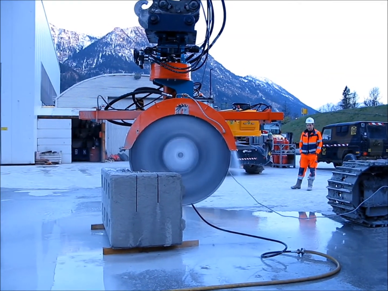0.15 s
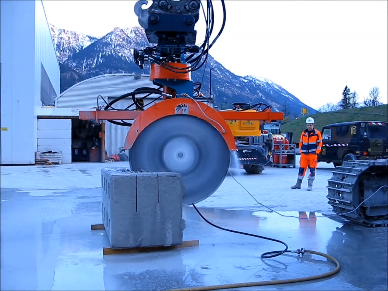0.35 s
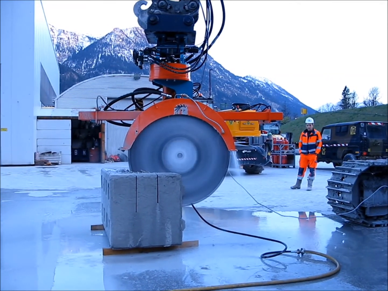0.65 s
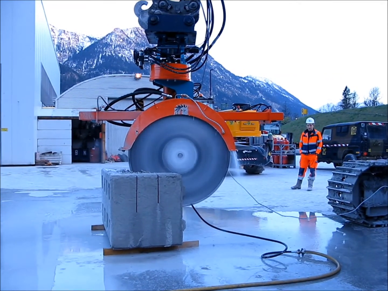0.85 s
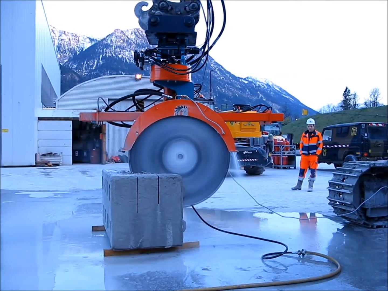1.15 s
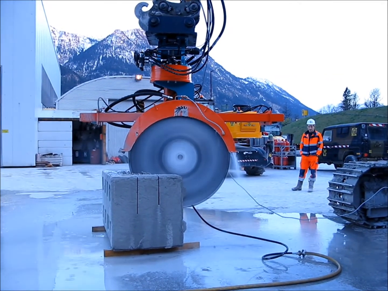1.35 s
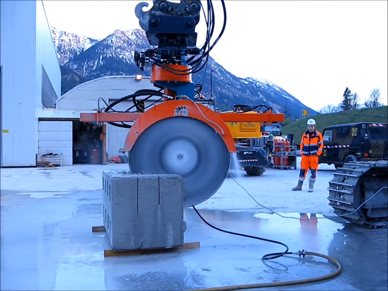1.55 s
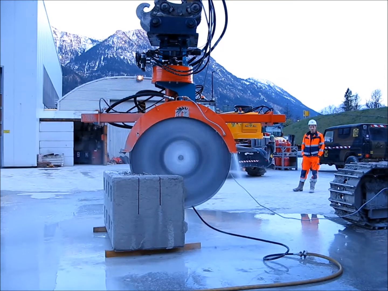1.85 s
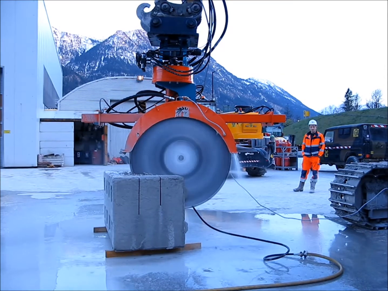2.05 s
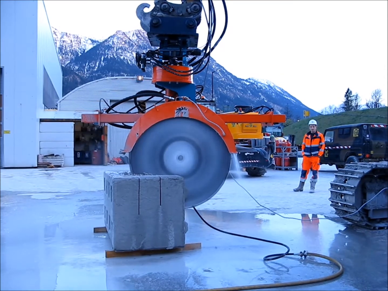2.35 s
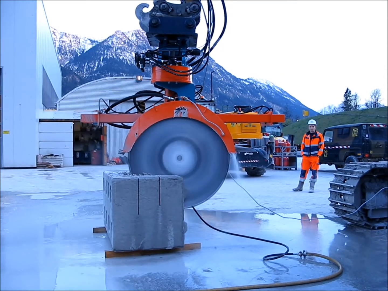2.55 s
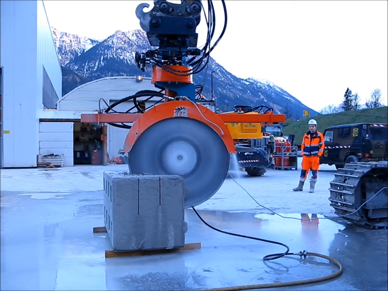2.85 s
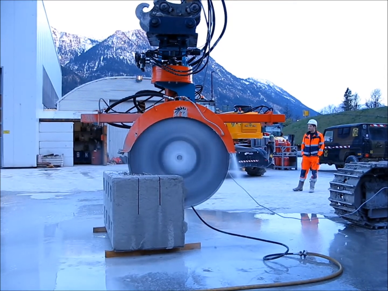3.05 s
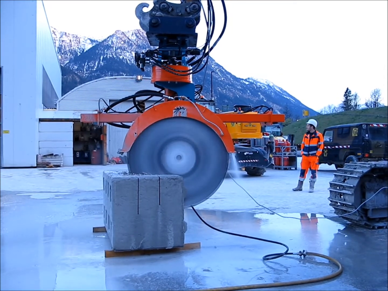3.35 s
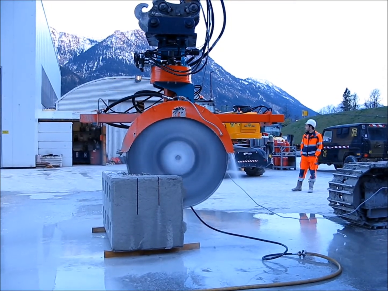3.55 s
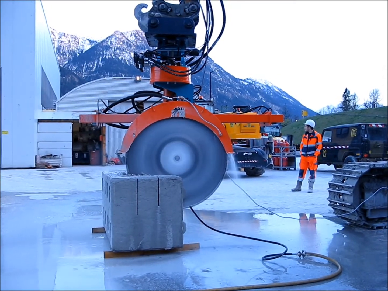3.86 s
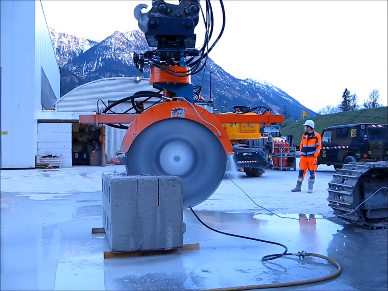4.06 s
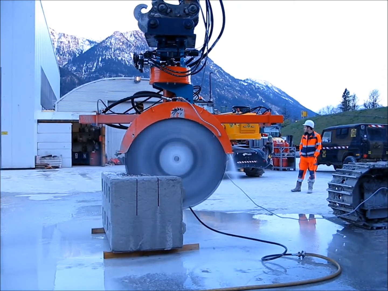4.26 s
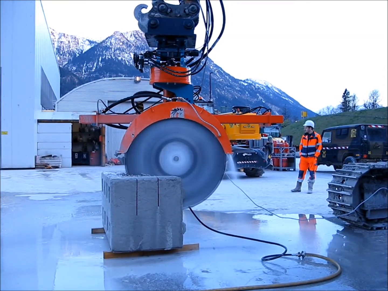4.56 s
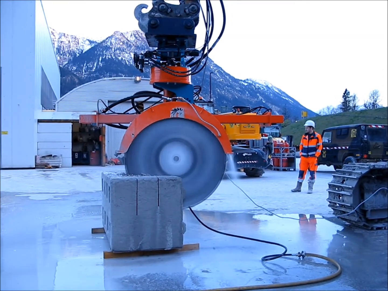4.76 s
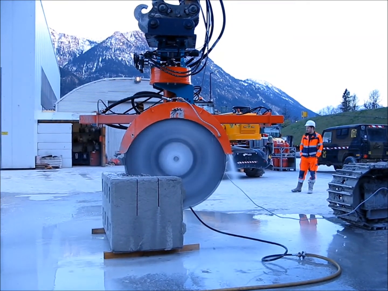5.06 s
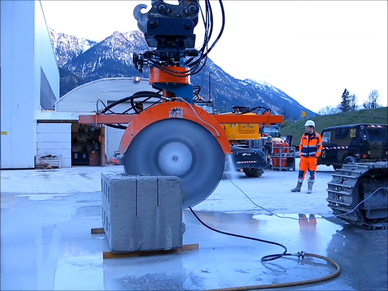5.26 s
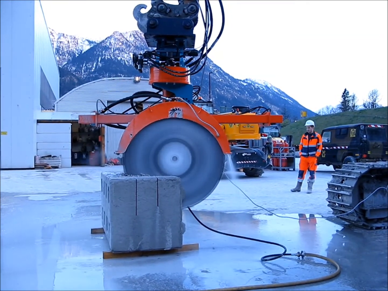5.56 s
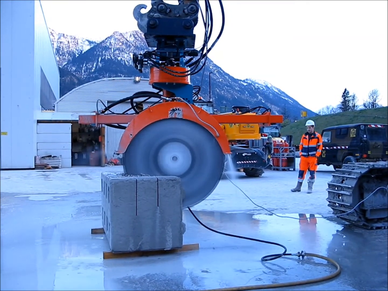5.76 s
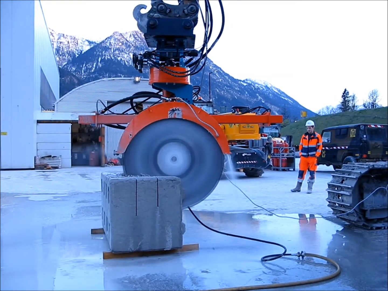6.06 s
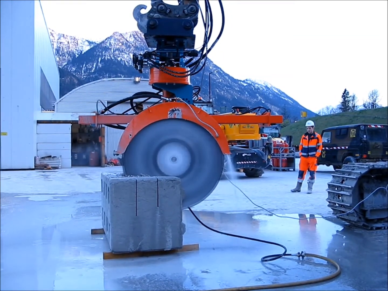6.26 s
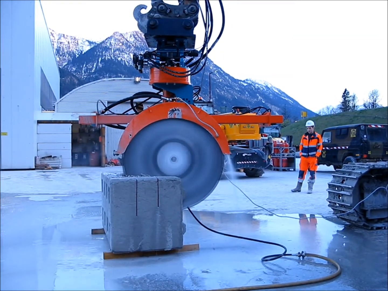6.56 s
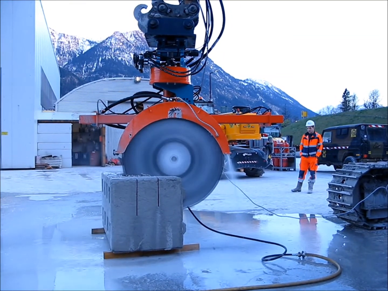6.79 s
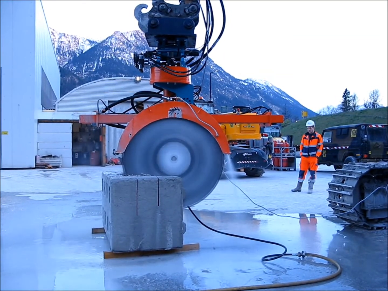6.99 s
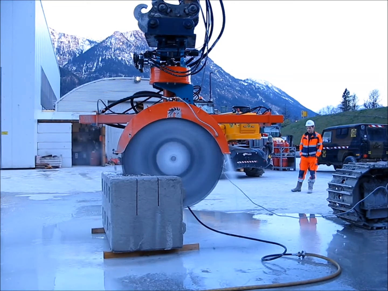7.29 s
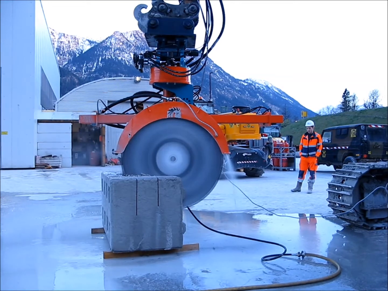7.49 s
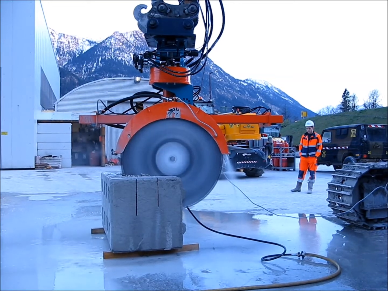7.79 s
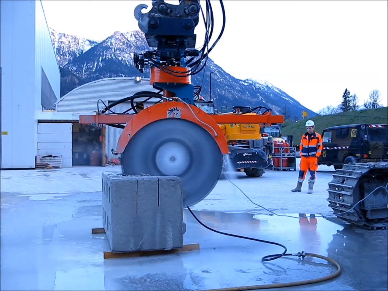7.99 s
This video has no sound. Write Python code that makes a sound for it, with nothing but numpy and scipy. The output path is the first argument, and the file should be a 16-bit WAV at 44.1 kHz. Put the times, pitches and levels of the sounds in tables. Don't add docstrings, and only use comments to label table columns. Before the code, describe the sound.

From 0 to about 8 seconds a large steel saw disc grinds continuously into a concrete block in an open wet yard, already running at the start and still running at the end. The noise is harsh, gritty and bright, a thick hiss of many metallic ringing pitches, strongest around 3 to 9 kHz, with little bass. It throbs about 9.5 times a second, each turn slightly different, with small surges near 0.8, 2, 3.2 and 4.9. A faint wavering whine near 570 Hz rises around 0.7, 2.2 and 3.6 to 4.1, nearly vanishes near 5.9, then returns weakly. The highest treble is a touch duller from 4 to 5.5, then opens slightly. At 6.4 a brief, dull, low-mid knock sounds from the block, partly buried. Engine and pump hum stays faint underneath. Centred, dry outdoor sound with only tiny stereo flecks.

```python
import sys
import numpy as np
from scipy import signal
from scipy.fft import rfft, irfft, next_fast_len
from scipy.io import wavfile
from scipy.ndimage import uniform_filter1d

SR = 44100
rng = np.random.default_rng(int(sys.argv[2]) if len(sys.argv) > 2 else 0)


def voltage_ratio(level):
    return 10 ** (np.asarray(level, float) / 20)


def log_audio(samples):
    frames = np.atleast_2d(samples).T
    limited = np.clip(frames, -1, 1)
    pcm = np.round(limited * 32767).astype(np.int16)
    wavfile.write(sys.argv[1], SR, pcm)


N = 358533

TURN_HZ = 9.518
SEGMENTS = 60
# t/s, slip off the even pass rate f/Hz, level/dB
SEGMENT_WHINE = [(0, -.1, -59), (.65, -.1, -47.5), (1.3, -.3, -56.5), (1.7, -.3, -65), (2.2, .2, -48),
                 (3.0, -.2, -50), (3.6, -.2, -46), (4.1, .4, -46.5), (4.7, .9, -54), (5.2, -.8, -62),
                 (5.85, -.8, -70), (6.9, -.3, -53), (7.8, -.3, -51), (8.13, -1, -57)]


def rms_one(x):
    return x / np.sqrt(np.mean(x ** 2) + 1e-20)


def in_time(rows):
    s, *columns = np.transpose(rows)
    return [np.interp(np.arange(N) / SR, s, c) for c in columns]


def at_hz(points, hz):
    points = np.array(points)
    return np.interp(np.log(hz), np.log(points[:, 0]), points[:, 1])


def drift(size, span):
    step = max(span / 8, 1)
    coarse = rng.standard_normal(size // 4 + 64)[:int(size / step) + 16]
    for _ in range(2):
        coarse = uniform_filter1d(coarse, size=8)
    return np.interp(np.arange(size) / step, np.arange(len(coarse)), rms_one(coarse))


def grinding():
    # t/s, level/dB
    openness = [
        (0, 1.2),
        (.7, .5),
        (1.5, 0.8),
        (2.1, 1.0),
        (3.3, 1),
        (4.1, -1.3),
        (5.5, -1),
        (6.9, -0.3),
        (8.13, 0),
    ]
    # f/Hz, share
    openness_share = [(1200, -0.3), (4000, -0.06), (8000, 0.7), (10000, -0.1), (12100, 1), (13500, 0)]
    # f/Hz, share
    repeat_share = [(150, .1), (320, .35), (450, .68), (580, .6), (800, .46), (1250, .21), (1800, .18),
                    (2600, .07), (5000, .05), (8000, .01)]
    # f/Hz, share
    load_share = [(500, 0.11), (1500, 0.1), (3500, 0.63), (7500, 0.96), (13000, 0.56)]

    size = next_fast_len(N + SR // 2)
    hz = np.maximum(np.arange(size // 2 + 1) * SR / size, 1e-3)
    clumps_db = 0.56 * drift(size, span=40.0)
    grit = rms_one(rng.standard_normal(size) * voltage_ratio(clumps_db))

    back = np.clip(at_hz(repeat_share, hz), 0, .95)
    memory = np.sqrt(1 - back ** 2) / (1 - back * np.exp(-2j * np.pi * hz / TURN_HZ))
    contact = irfft(rfft(grit) * memory, size)
    sound = rfft(shifting_modes(contact)) * saw_colour(hz)

    load_db = rim_load_db() + 0.32 * drift(N, span=1300.0)
    open_db, = in_time(openness)
    strike_db = uniform_filter1d(in_time(SEGMENT_WHINE)[1], SR) + 54

    centres = np.sort(np.append(np.geomspace(200, 15700, 13), [12100, 13500]))
    out = np.zeros(N)
    for centre in centres:
        share = np.interp(np.log(hz), np.log(centres), centres == centre)
        band = irfft(sound * share, size)[:N]
        block_hum = 0.1 * np.exp(-(np.log(centre / 450) / 0.42) ** 2)
        slow_db = at_hz(openness_share, centre) * open_db + block_hum * strike_db
        out += band * voltage_ratio(slow_db + at_hz(load_share, centre) * load_db)
    return voltage_ratio(0.56) * out


def rim_load_db():
    # place as share of a turn, width as share of a turn, height over the low rim level/dB
    high_spots = [
        (.23, 0.081, 1.34),
        (.49, 0.058, 1.5),
        (.73, 0.092, 4.0),
    ]
    # t/s, level/dB, length/s
    surges = [(.77, 1, .03), (0.838, -0.5, .03), (1.02, 0.5, .04), (1.13, 0, 0.013), (1.65, -2, .04),
              (1.92, 1, 0.11), (2.18, 1.5, 0.043), (3.227, 1.2, 0.067), (3.648, 1, .04), (3.76, -.9, .04),
              (4.38, 0.3, .04), (4.804, -1, .04), (4.92, 2, 0.055), (5.748, -0.5, .04), (5.85, 0, .04),
              (6.07, 1.0, 0.037), (6.17, -1.5, .04), (7.17, -0.2, .08), (7.54, -1, .05), (7.75, -0.3, .05)]
    low_rim_db = -2.06
    bite_spread, feed_spread_db = 0.23, 0.27

    t = np.arange(N) / SR
    profile = np.full(N, low_rim_db)
    for place, width, db in high_spots:
        away = (t * TURN_HZ - place + .5) % 1 - .5
        profile += db * np.exp(-.5 * (away / width) ** 2)

    turns = np.arange(int(N / SR * TURN_HZ) + 2)
    chances = rng.standard_normal((len(turns), 2)).T
    bite, feed = (np.interp(t * TURN_HZ, turns, c) for c in chances)
    surge_db = sum(db * np.exp(-.5 * ((t - s) / length) ** 2) for s, db, length in surges)
    return profile * (1 + bite_spread * bite) + feed_spread_db * feed + surge_db


def saw_colour(hz):
    # f/Hz, level/dB per Hz
    broad_colour = [(5, -104), (30, -102), (55, -91), (100, -88.5), (140, -114), (230, -100), (330, -88),
                    (365, -75.5), (420, -82), (480, -74.5), (550, -77.5),
                    (610, -79.2), (800, -77.0), (1080, -79.2), (1300, -68.4), (1450, -75.9), (1750, -73.3),
                    (2050, -72.8), (2300, -73.6), (2580, -69.1),
                    (2620, -72.8), (2900, -68.9), (3500, -63.9), (3950, -62.5), (4550, -66.1), (5200, -64.9),
                   (5900, -69.0), (6200, -67.9), (6640, -74.8),
                    (6660, -71.6), (7300, -69.5), (7900, -69.8), (8500, -71.1), (9350, -74.3),
                     (10200, -68.8), (10950, -67.4),
                    (11050, -67.8), (12000, -70.8), (12600, -73.1), (13500, -69.1), (14330, -72.6),
                      (14800, -72.1), (15740, -76.0)]
    # f/Hz, width/Hz, rms level/dB
    ringing_modes = [(767, 31, -59.6), (939, 73, -50.0), (1140, 12, -60.9), (1242, 25, -49.4),
                     (1308, 12, -53.8), (1417, 12, -59.6), (1504, 41, -49.0), (1593, 40, -48.7),
                     (1707, 12, -58.4), (1818, 17, -56.7), (1874, 19, -57.4), (1987, 15, -53.1),
                     (2120, 89, -45.5), (2268, 47, -45.8), (2390, 81, -44.1), (2507, 12, -62.0),
                     (2655, 15, -50.6), (2720, 12, -50.6), (2801, 119, -39.5), (2925, 12, -48.1),
                  (2971, 47, -42.0), (3099, 78, -40.2), (3217, 22, -46.0), (3322, 46, -43.1),
                  (3422, 24, -43.6), (3464, 27, -43.9), (3530, 72, -39.5), (3650, 70, -40.4),
                  (3729, 12, -48.7), (3839, 46, -45.6), (4243, 159, -36.9), (4715, 18, -51.5),
                  (4826, 159, -39.6), (5096, 23, -47.5), (5247, 12, -52.7), (5366, 12, -51.0),
                  (5541, 69, -41.9), (6014, 58, -46.0), (6319, 15, -52.0), (6389, 12, -54.1),
                  (6490, 24, -48.4), (6588, 62, -47.4),
                     (6761, 32, -49.9), (6915, 159, -41.9), (7069, 22, -50.9), (7192, 25, -47.9),
                    (7301, 98, -42.5), (7460, 17, -44.7), (7531, 48, -44.2), (7745, 68, -40.5),
                    (7899, 85, -41.2), (8038, 12, -48.8), (8123, 99, -40.6), (8318, 81, -42.5),
                    (8490, 60, -44.0), (8655, 90, -41.5), (8769, 26, -49.1), (8889, 159, -42.8),
                    (9018, 96, -43.8), (9168, 30, -46.6), (9242, 26, -48.6), (9478, 129, -44.6),
                    (9758, 159, -43.0), (9947, 52, -48.8), (10055, 31, -52.1), (10417, 17, -54.0),
                    (10526, 12, -59.4), (10745, 76, -47.9),
                     (11177, 48, -48.5), (11315, 32, -51.7), (11552, 76, -48.4), (11771, 97, -48.1),
                     (12031, 38, -54.2), (12224, 20, -52.7), (12281, 63, -50.5), (12647, 60, -47.3),
                     (12872, 44, -50.7), (13016, 29, -46.7), (13083, 37, -49.4), (13171, 14, -55.3),
                     (13373, 19, -53.1), (13438, 159, -45.6), (13666, 12, -50.7), (13781, 39, -43.8),
                     (13956, 29, -46.2), (14197, 122, -41.2), (14411, 14, -51.3), (14601, 148, -40.8),
                     (14709, 16, -51.3), (14893, 113, -42.5), (15021, 21, -50.0), (15164, 159, -43.5),
                     (15410, 34, -48.3), (15496, 159, -42.3)]
    # f/Hz, width/Hz, depth/dB
    notches = [(660, 90, 2), (1070, 50, 2), (1170, 40, 2.5), (2580, 120, 1.5), (3930, 80, 1.5),
               (5900, 40, 1.5), (12750, 40, 2), (14330, 60, 3)]

    broad = broad_colour
    power = voltage_ratio(at_hz(broad, hz)) ** 2
    for centre, width, level_db in ringing_modes:
        peak = voltage_ratio(level_db) ** 2 / (np.pi * width / 2)
        power = power + peak / (1 + (2 * (hz - centre) / width) ** 2)
    dips_db = sum(depth / (1 + (2 * (hz - centre) / width) ** 2) for centre, width, depth in notches)
    thicket_db = .4 * drift(len(hz), span=16.0 / (hz[2] - hz[1]))
    return np.sqrt(power * SR / 2) * voltage_ratio(thicket_db - dips_db)


def shifting_modes(x):
    window = dict(nperseg=2048, noverlap=1536)
    frames = signal.stft(x, **window)[2]
    single_db = 2.1 * patches(frames.shape, hz_steps=1.0, time_steps=22.0)
    groups_db = .6 * patches(frames.shape, hz_steps=6.0, time_steps=40.0)
    bursts_db = .6 * patches(frames.shape, hz_steps=40.0, time_steps=2.0)
    gain = voltage_ratio(single_db + groups_db + bursts_db)
    gain = gain / np.sqrt(np.mean(gain ** 2, axis=1, keepdims=True))
    return signal.istft(frames * gain, **window)[1][:len(x)]


def patches(shape, hz_steps, time_steps):
    field = rng.standard_normal(shape)
    for _ in range(2):
        field = uniform_filter1d(field, max(round(hz_steps), 1), axis=0)
        field = uniform_filter1d(field, max(round(time_steps), 1), axis=1)
    return rms_one(field)


def whine():
    slip_hz, level_db = in_time(SEGMENT_WHINE)
    start_turns = .01
    angle = 2 * np.pi * (np.cumsum(SEGMENTS * TURN_HZ + slip_hz) / SR + start_turns)
    tone = voltage_ratio(level_db + 0.6 + 1.6 * drift(N, span=4000.0)) * np.sin(angle)
    octave_level = voltage_ratio(-63 + 2.0 * drift(N, span=6000.0))
    tone += octave_level * np.sin(2 * angle + .8 * drift(N, span=5000.0))
    lower_angle = angle * (SEGMENTS - 8) / SEGMENTS
    tone += voltage_ratio(-39.5 + level_db / 2) * np.sin(lower_angle + .6 * drift(N, span=6100.0))
    return np.sqrt(2) * tone


def knocks():
    # t/s, f/Hz, time to fall 60 dB t/s, peak level/dB
    rings = [
        (6.405, 700, .1, -34),
        (6.4, 610, .12, -38),
        (6.41, 960, .09, -39),
    ]
    out = np.zeros(N)
    for s, hz, t60, peak_db in rings:
        age = np.maximum(np.arange(N) / SR - s, 0)
        loudness = voltage_ratio(peak_db - 60 * age / t60) * np.tanh(age / 0.0066)
        out += loudness * np.sin(2 * np.pi * hz * age * (1 - 2.6 * age))
    return out


def engine():
    # multiple of the crank rate, rms level/dB
    orders = [(2, -59.5), (4, -78), (5, -84), (6, -77), (7, -85), (8, -76), (9, -66), (10, -69.5),
              (11, -80), (12, -59.5), (15, -70), (18, -55.5), (20, -71)]
    crank_hz = 31.335
    angle = 2 * np.pi * crank_hz * np.arange(N) / SR + 0.021 * drift(N, span=11600.0)
    out = np.zeros(N)
    for order, level_db in orders:
        level = voltage_ratio(level_db + 1.0 * drift(N, span=4500.0))
        out += level * np.sin(order * angle + rng.uniform(0, 2 * np.pi))
    return np.sqrt(2) * out


def scene():
    mono = grinding() + whine() + engine() + knocks()
    return np.stack([mono, mono])


def side_flecks(mono):
    # middle t/s, lowest f/Hz, width/Hz
    flecks = [(.335, 9650, 1370), (.337, 4220, 940), (.546, 9650, 1370), (.964, 4220, 940),
              (.964, 6890, 1370), (1.289, 8960, 1370), (1.892, 13790, 1370), (3.053, 11800, 1290),
              (3.286, 4220, 940), (3.286, 6890, 1370), (4.168, 5720, 3920), (4.168, 14470, 1270),
              (4.354, 6890, 1370), (4.423, 12410, 1260), (4.435, 6940, 2700), (5.631, 4220, 940),
              (5.631, 11720, 1370), (6.303, 11030, 1370), (6.583, 5170, 1110), (6.931, 10380, 2020),
              (7.605, 4220, 940), (7.605, 11030, 1370)]
    level_db, frame = -3, 2048
    side = np.zeros(N)
    hz = np.arange(frame // 2 + 1) * SR / frame
    window = signal.windows.kaiser_bessel_derived(frame, 4 * np.pi)
    for s, low_hz, width_hz in flecks:
        band = (hz > low_hz) * (hz < low_hz + width_hz)
        start = round(s * SR) - frame // 2
        here = slice(start, start + frame)
        band_level = np.std(irfft(rfft(mono[here]) * band))
        noise = rms_one(irfft(rfft(rng.standard_normal(frame)) * band))
        side[here] += voltage_ratio(level_db) * band_level * noise * window
    return side


def roll_off(x):
    return signal.sosfilt(signal.butter(12, 16620, fs=SR, output="sos"), x)


def record(dry):
    size = next_fast_len(N)
    kept = np.arange(size // 2 + 1) * SR / size < 15740
    cut = irfft(rfft(dry, size) * kept, size)[:, :N]
    mix = cut + side_flecks(cut[0]) * [[1], [-1]]
    return roll_off(mix)


dry = scene()
out = record(dry)
log_audio(out)
```